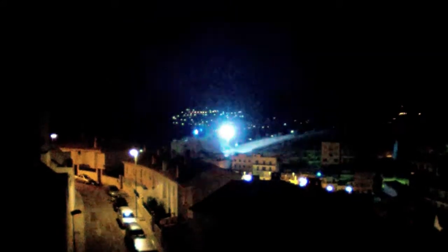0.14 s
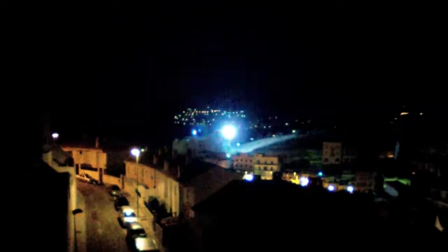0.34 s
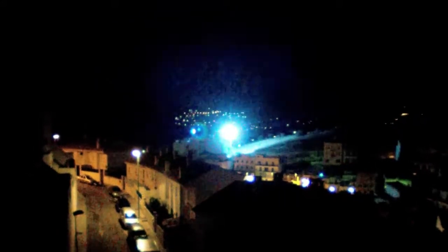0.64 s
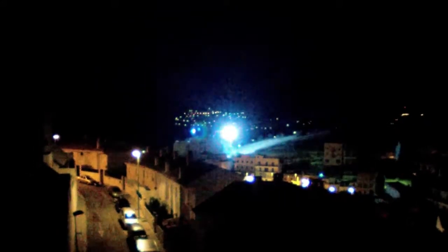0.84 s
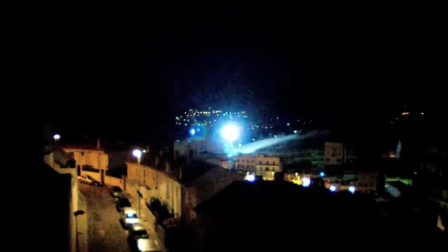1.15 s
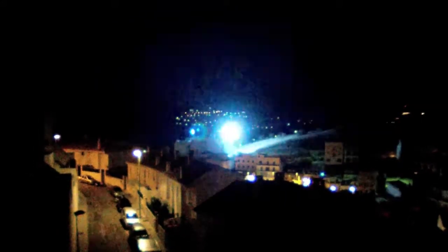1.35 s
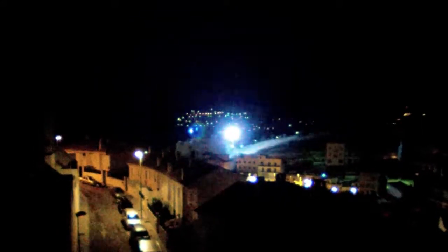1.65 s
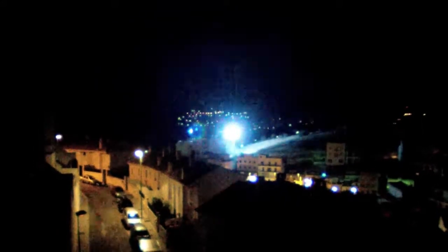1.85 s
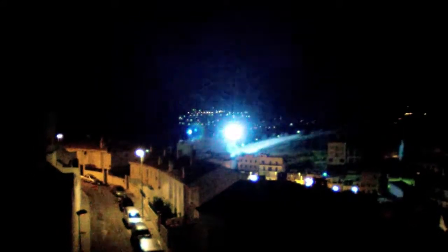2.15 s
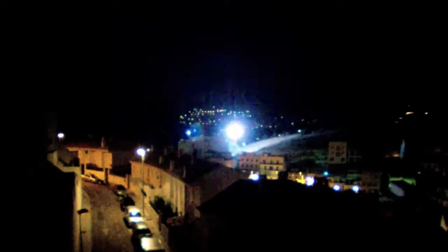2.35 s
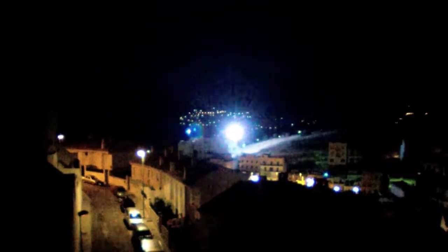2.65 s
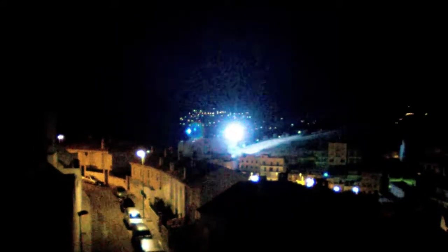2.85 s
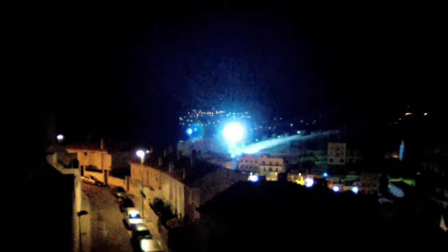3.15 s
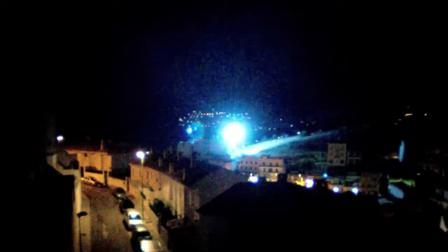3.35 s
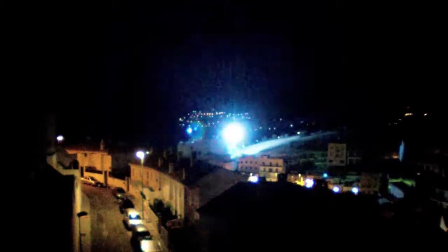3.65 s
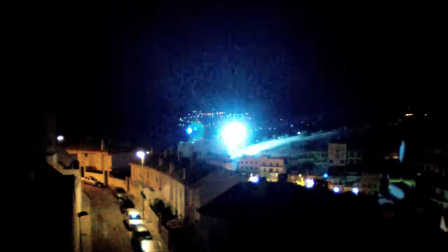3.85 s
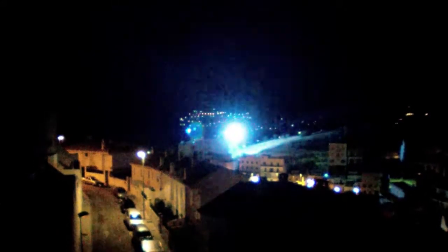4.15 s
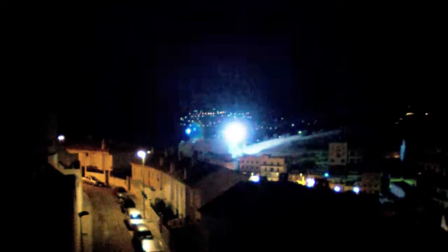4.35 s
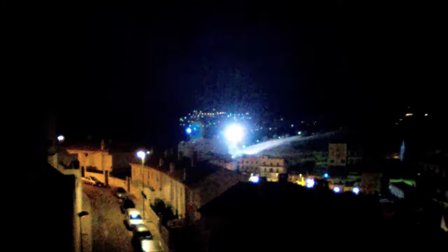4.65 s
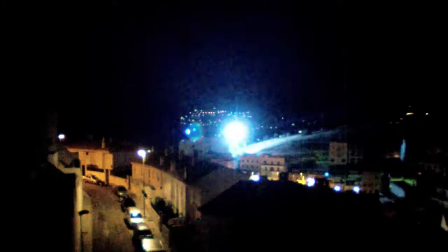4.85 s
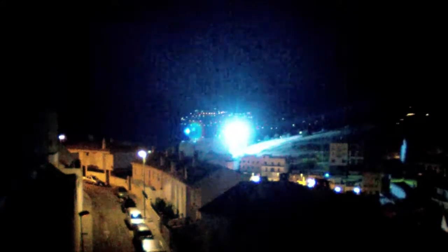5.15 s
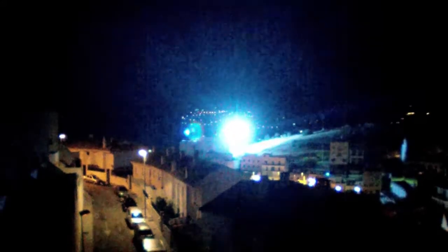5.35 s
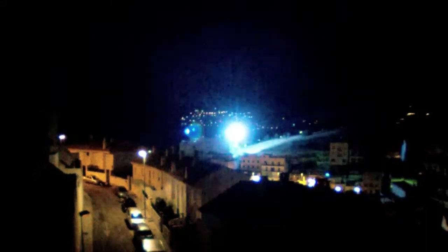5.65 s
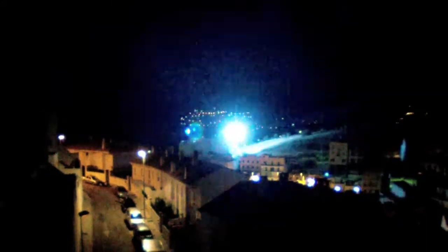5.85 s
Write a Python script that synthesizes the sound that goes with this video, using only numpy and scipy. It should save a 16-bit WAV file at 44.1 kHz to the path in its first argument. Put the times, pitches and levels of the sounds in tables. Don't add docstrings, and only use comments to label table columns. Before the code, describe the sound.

A distant high-voltage arc crackles and sizzles over a night town, with dense irregular sharp snaps echoing off house fronts above faint hiss.

```python
import sys
import numpy as np
from scipy import signal
from scipy.fft import rfft, irfft, next_fast_len
from scipy.io import wavfile
from scipy.ndimage import map_coordinates

SR = 44100
rng = np.random.default_rng(int(sys.argv[2]) if len(sys.argv) > 2 else 0)


def to_wav(sig):
    pcm = np.clip(np.atleast_2d(sig), -1, 1) * 32767
    pcm = np.round(pcm).astype(np.int16)
    wavfile.write(sys.argv[1], SR, pcm.T)


def volts_from_decibels(level):
    exponent = np.asarray(level, float) / 20
    return 10 ** exponent


N = 264159


def along(points, hz):
    f, value = np.transpose(points)
    return np.interp(np.log(hz + 1), np.log(f + 1), value)


def curves(rows):
    s, *columns = np.transpose(rows)
    return [np.interp(np.arange(N) / SR, s, column) for column in columns]


def drift(rate):
    knots = rng.standard_normal(int(N * rate / SR) + 4)
    return map_coordinates(knots, [np.arange(N) * rate / SR])


def unit(x):
    return x / np.linalg.norm(x)


def below(x, hz):
    return signal.sosfiltfilt(signal.butter(3, hz, fs=SR, output="sos"), x)


def hiss(level_db=-46):
    # frequency in Hz, density in dB per Hz.
    density = [(20, -17), (60, -14), (200, -6), (500, -1), (1000, -6), (2500, -6.5), (3500, -12),
               (6000, -21.5), (9300, -30), (12500, -22.5), (14500, -20.5), (15200, -15.5), (15800, -27)]
    size = next_fast_len(N)
    spectrum = rfft(rng.standard_normal(size))
    spectrum *= volts_from_decibels(along(density, np.fft.rfftfreq(size, 1 / SR)))
    noise = irfft(spectrum, size)[:N]
    flutter_db = 0.38 * drift(14) + 0.25 * drift(60)
    return volts_from_decibels(level_db + flutter_db) * unit(noise) * np.sqrt(N)


def line_scan(scan_hz=15734.3, level_db=-68):
    t = np.arange(N) / SR
    return volts_from_decibels(level_db) * np.sin(2 * np.pi * scan_hz * t + 0.7 * drift(15))


def sizzle(per_second=280, spread_db=4.0, varied_db=6):
    # time in seconds, level in dB, brightness in dB.
    strength = [(0.0, -36.5, 4), (0.57, -39.5, 0), (1.38, -37.5, -3), (1.8, -39.5, 1.5), (2.05, -42.5, -21),
                (2.15, -37, -6), (2.5, -42, 4.5), (2.65, -39, -2.5), (3.49, -39.5, -1), (3.74, -42, 4),
                (4.02, -38.5, -1), (4.22, -37.5, -1), (4.34, -36.5, 3), (4.74, -37, 2), (5.34, -37.5, 1),
                (5.59, -35, -1), (5.99, -33, -8)]
    level_db, bright_db = curves(strength)
    luck = rng.random((4, N))
    crest_hz, first_crest_s, crowding = 100, 0.002, 0.6
    crest = 1 + crowding * np.cos(2 * np.pi * crest_hz * (np.arange(N) / SR - first_crest_s))
    fires = luck[0] < crest * per_second / SR
    rare_db = spread_db * np.minimum(-np.log(1 - luck[1]), 2.6)
    polarity = np.sign(luck[2] - 0.3)
    size = volts_from_decibels(rare_db + 0.93 * drift(24.95)) * polarity
    train = unit(size * fires) * np.sqrt(N) * volts_from_decibels(level_db - 4)
    thin = train * volts_from_decibels(bright_db + varied_db * (2 * luck[3] - 1.5))
    return thin + below(train - thin, 1320)


def snaps(tick_bright_db=6, snap_bright_db=-0.5, snap_edge_db=4.5, strike_db=1.5):
    # time in seconds, strength in dB, treble in dB, edge in dB.
    cracks = [(0.0217, -4.5, 2.5, -1), (0.1116, -5.5, -1, -1), (0.3119, -7.5, 5.5, -17),
              (0.4704, -6, -10, 6), (0.6206, -7.5, 4, -8), (0.8338, -5.5, -9, 10), (1.132, -0.5, -5, -8),
              (1.3501, -4, 3, -4), (1.7012, -6.5, -10, -3), (1.9721, -3, 4.5, -8), (2.0514, -2.5, -1.5, 6),
              (2.1428, -9, -5.5, 16.5), (2.3724, -6.5, 4.5, -1), (2.5303, 3.5, 1, -1),
              (2.6657, -2.5, -4, 4), (3.0909, -5, -6, -5), (3.6623, -0.4, 5, -5.5), (3.9997, -17.5, 18, 3),
              (4.079, -7.5, 9, -3), (4.1453, -7.5, 7, 5), (4.1821, -2, -3, -2), (4.343, -4.5, 4, -5),
              (4.3597, -8, 2, 13), (4.4618, -8.5, 5, -3), (4.768, -5.5, -2, 4), (5.061, -6, -8, 11),
              (5.0695, -3.5, 3.5, 6.5), (5.252, -4, -13, 12), (5.4638, 9, 0, 3.5), (5.63, -1, -5.5, 11)]
    # time in seconds, strength in dB.
    middling = [(0.4436, -10.5), (0.5736, -10.5), (0.8041, -10), (0.9179, -9), (0.992, -12.5),
                (1.09, -12.5), (1.1199, -12), (1.1461, -10), (1.504, -10.5), (1.9442, -10), (1.9949, -10.5),
                (2.2597, -6.5), (2.482, -9.5), (3.0432, -12.5), (2.859, -18), (2.875, -10), (3.2394, -11.5),
                (3.5623, -9), (3.5988, -10.5), (3.8088, -9), (4.3221, -11), (4.5025, -7), (4.5701, -10),
                (4.9411, -9.5), (4.9613, -10.5), (5.214, -7.5), (5.4012, -8.5), (5.4115, -8), (5.548, -13),
                (5.8196, -6.5)]
    # time in seconds, strength in dB.
    thin_sparks = [(0.594, -10), (1.2113, -17), (1.3631, -10.5), (1.4789, -14), (1.592, -12.5),
                   (1.8086, -11), (2.0332, -13.5), (2.082, -7.5), (2.1826, -13), (2.284, -11), (2.2897, -7),
                   (2.313, -11), (2.4523, -10.5), (2.8252, -12), (3.364, -17), (2.9624, -11), (3.534, -19),
                   (3.7734, -16.5), (4.1104, -14), (4.244, -9.5), (4.2708, -10), (4.3535, -12),
                   (4.7256, -14.5), (4.8107, -12), (5.0222, -12.5), (5.3332, -13.5), (5.4527, -14),
                   (5.6852, -12.5), (5.8714, -17), (5.7838, -17)]
    rounder = [(s, db, snap_bright_db, snap_edge_db) for s, db in middling]
    ticks = [(s, db, tick_bright_db, 0) for s, db in thin_sparks]
    s, db, bright_db, edge_db = np.transpose(cracks + rounder + ticks)
    at = np.round(s * SR).astype(int)
    body_db = db + strike_db
    treble_db = body_db + bright_db
    shock_db = body_db + 1.7 * db - 12.5
    layers = np.zeros((4, N))
    layers[:, at] = volts_from_decibels([body_db, treble_db, treble_db + edge_db, shock_db])
    body, treble, edge, shock = layers
    return shock + below(edge - shock, 4250) + below(treble - edge, 2290) + below(body - treble, 1470)


def causal(spectrum, size=4096):
    cepstrum = irfft(np.log(volts_from_decibels(along(spectrum, np.fft.rfftfreq(size, 1 / SR)))))
    cepstrum[1:size // 2] *= 2
    cepstrum[size // 2 + 1:] = 0
    return unit(irfft(np.exp(rfft(cepstrum)))[:size // 8])


def paths(table):
    ms, gain = np.transpose(table)
    return np.bincount(np.round(ms * SR / 1000).astype(int), gain, SR // 30)


def balcony(shade_hz=2350, treble_db=3):
    # delay in ms, reflection from -1 to 1.
    wall_paths = [(0.0, 0.13), (0.4, -0.65), (0.76, 0.29), (1.09, 0.00095), (1.32, -0.28), (2.43, -0.29),
                  (2.88, 0.29), (3.72, 0.49), (5.03, 0.21), (5.76, -0.66), (6.73, 0.27), (7.48, 0.06),
                  (8.3, 0.37), (9.12, 0.37), (10.93, -0.08), (11.5, 0.18), (12.43, 0.55), (13.24, 0.5),
                  (14.13, 0.61), (15.03, 0.24), (15.62, -0.14), (16.71, 0.41), (18.05, -0.3),
                  (21.02, -0.34), (23.83, 0.43)]
    # delay in ms, reflection from -1 to 1.
    pane_paths = [(0.45, -0.95), (1.6, 0.23), (2.3, -0.14), (3.6, -0.42), (5.4, 0.15), (11.6, 0.4),
                  (13.5, 0.042), (17, 0.23)]
    walls = paths(wall_paths)
    walls[:SR // 1200] *= volts_from_decibels(2.5)
    walls[SR // 5000:SR // 1200] *= volts_from_decibels(2.5)
    hard = volts_from_decibels(treble_db) * paths(pane_paths)
    top = volts_from_decibels(treble_db + 9.5) * paths(pane_paths[1:2])
    treble = below(below(hard - top, 4500), 4700)
    body = below(below(walls - hard, shade_hz), shade_hz)
    return top + treble + body


def scattered(x, t60, start_s, rise_s, count):
    out = np.zeros(N + SR)
    edges = np.linspace(0, N, count + 1).astype(int)
    size = SR // 2
    rise = 1 - np.exp(-np.arange(size) / SR / rise_s)
    for a, b in zip(edges, edges[1:]):
        hz, t, z = signal.stft(rng.standard_normal(size), SR, nperseg=128)
        decay = volts_from_decibels(-60 * t / t60(hz)[:, None])
        tail = signal.istft(z * decay, SR, nperseg=128)[1][:size]
        wet = signal.fftconvolve(x[a:b], unit(tail * rise))
        out[a + round(start_s * SR):][:len(wet)] += wet
    return out[:N]


def arc():
    # frequency in Hz, level in dB.
    colour = [(200, -40), (450, -14), (800, -5.5), (1100, 0.5), (1500, -5.5), (1900, -2), (2350, -12),
              (2900, -9), (3500, -28.5), (4700, -41), (6100, -24.5), (7300, -49), (16000, -50)]
    # frequency in Hz, decay by 60 dB in seconds.
    railings = [(1000, 0.09), (2000, 0.061), (3000, 0.015), (6000, 0.019)]
    # frequency in Hz, decay by 60 dB in seconds.
    street = [(400, 0.6), (1200, 1), (3000, 0.33), (6000, 0.39)]
    pulse = causal(colour)
    sparks = snaps() + sizzle()
    near = signal.fftconvolve(sparks, unit(np.convolve(pulse, balcony())))[:N]
    bare = below(signal.fftconvolve(sparks, pulse)[:N], 5800)
    clutter = scattered(bare, lambda hz: along(railings, hz), start_s=0.002004, rise_s=0.0019, count=60)
    fronts = scattered(bare, lambda hz: along(street, hz), start_s=0.022, rise_s=0.01, count=36)
    return near + volts_from_decibels(-12.5) * clutter + volts_from_decibels(-10.5) * fronts


def lens_motor(motor_hz=2999.8, level_db=-57, overtone_db=-15):
    on_s, off_s, ramp_s = 2.6, 4.73, 0.05
    t = np.arange(N) / SR
    running = np.clip(np.minimum(t - on_s, off_s - t) / ramp_s + 0.5, 0, 1)
    phase = 2 * np.pi * motor_hz * t
    return volts_from_decibels(level_db) * running * (np.sin(phase) + volts_from_decibels(overtone_db) * np.sin(4 * phase))


def scene():
    return (arc() + hiss() + line_scan() + lens_motor())[None]


def low_pass(x):
    return signal.sosfilt(signal.butter(12, 16990, fs=SR, output="sos"), x)


def record(dry):
    bent = dry + 0.022 * dry ** 2 - 0.04 * dry ** 3
    top_hz = 15770
    kept = irfft(rfft(bent) * (np.fft.rfftfreq(N, 1 / SR) < top_hz), N)
    return low_pass(kept)


dry = scene()
out = record(dry)
to_wav(out)
```